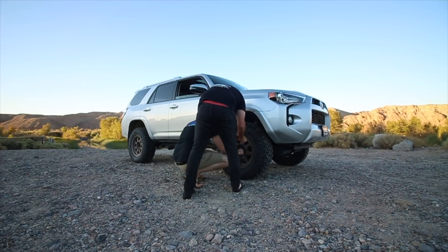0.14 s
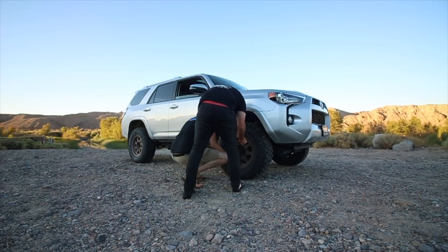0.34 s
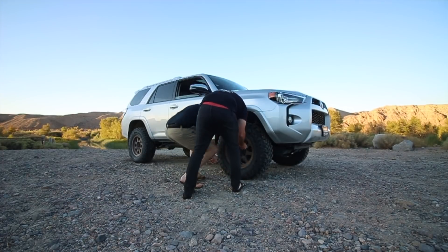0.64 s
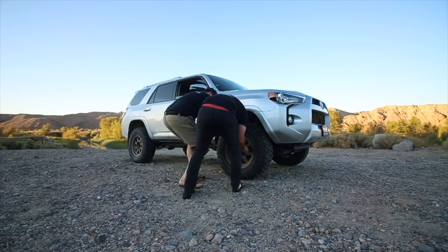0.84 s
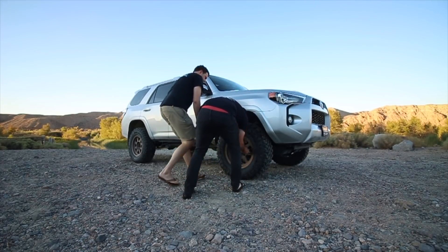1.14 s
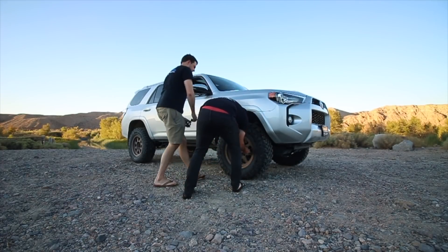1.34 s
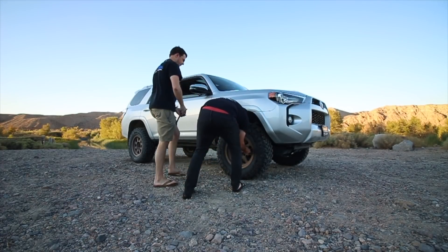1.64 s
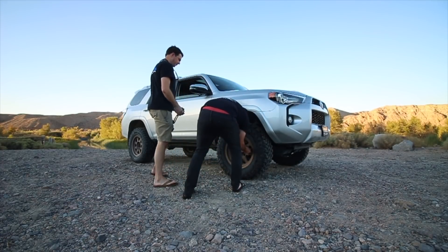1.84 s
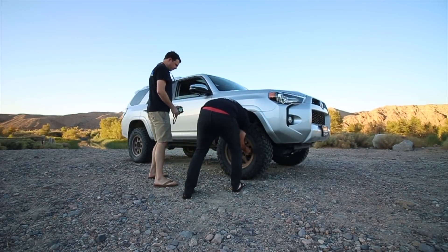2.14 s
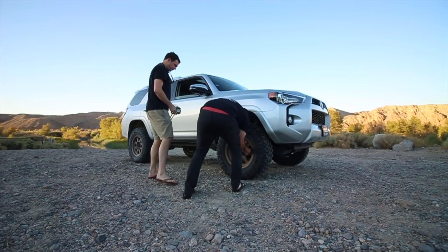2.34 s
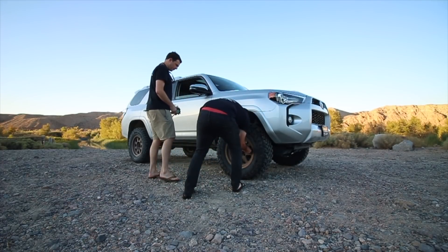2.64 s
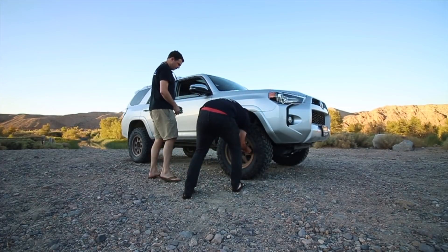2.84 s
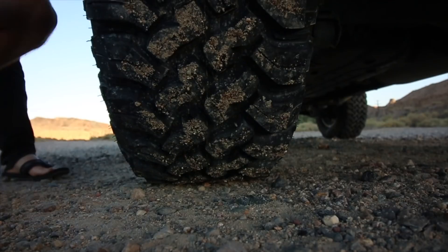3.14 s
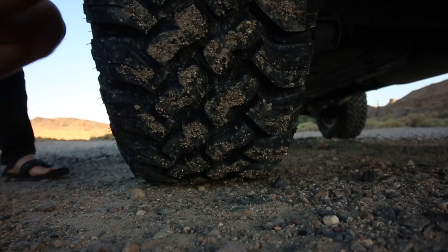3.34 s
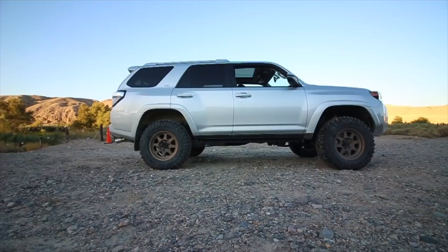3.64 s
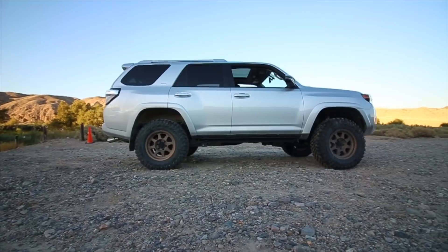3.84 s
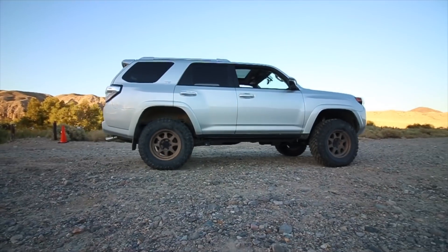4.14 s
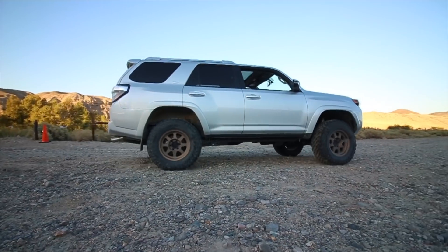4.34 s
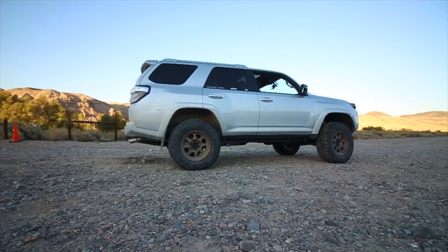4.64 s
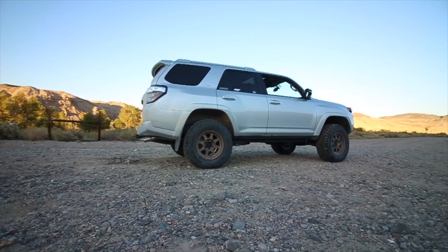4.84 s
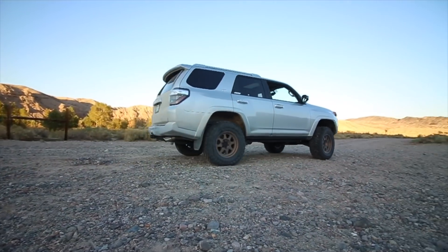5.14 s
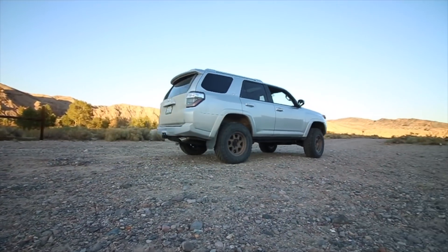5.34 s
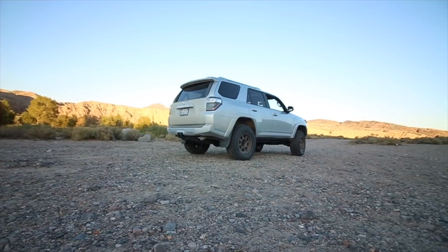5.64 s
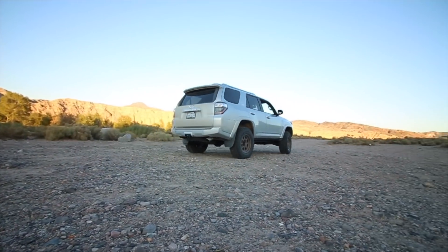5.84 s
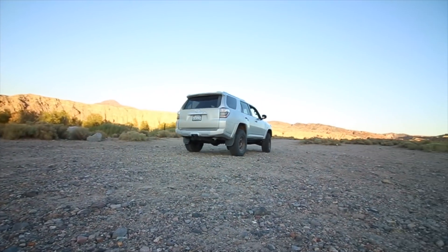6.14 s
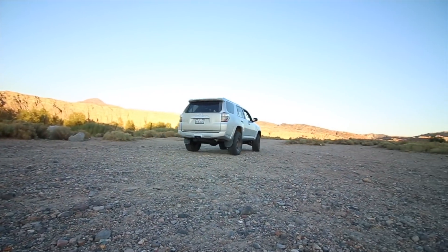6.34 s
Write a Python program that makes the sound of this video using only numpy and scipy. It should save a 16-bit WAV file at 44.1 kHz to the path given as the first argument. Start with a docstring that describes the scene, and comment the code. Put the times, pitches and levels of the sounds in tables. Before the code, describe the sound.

A tyre is let down outdoors: steady rushing air, a strong swell, a brighter hiss, then a fading pinch and descending chirps. Near-quiet with a faint finger scuff follows, then an abrupt second spurt that ends sharply. The scene cuts through a blink of silence to a heavy vehicle passing near the microphone, low rumble beneath gritty gravel crunch, pebble clicks and dull knocks, gradually moving off. Everything sits left, with barely audible noise on the right.

```python
"""Over faint outdoor noise a tyre valve cracks open and air hisses out: resonant turbulence plus a free jet. A
long release, pinched shut with a falling squeal, is followed by a shorter one that stops dead. In each, one
broad blast of noise thins into a bright jet. After a brief silence the scene changes: a vehicle rolls slowly
past and away over gravel: shaped noise and random impacts whose gain follows distance, with stones popping as
damped tones and noise bursts. All this is on the left channel; the right holds only a faint noise floor."""
import sys
import numpy as np
from scipy import signal
from scipy.fft import rfft, irfft, next_fast_len
from scipy.io import wavfile
from scipy.ndimage import map_coordinates

SR = 44100
rng = np.random.default_rng(int(sys.argv[2]) if len(sys.argv) > 2 else 0)


def waveform_to_disk(signal):
    """Save audio, clipped to [-1, 1], as 16-bit WAV at the path in sys.argv[1]."""
    frames = np.transpose(np.atleast_2d(signal))
    scaled = np.clip(frames, -1, 1) * 32767
    samples = np.round(scaled).astype(np.int16)
    wavfile.write(sys.argv[1], SR, samples)


N = 287002  # length in samples
# Source levels in dB are set before the common gain of 2 on the left channel.


def amp(db):
    """Logarithmic level: decibels to amplitude gain."""
    return 10 ** (np.asarray(db) / 20)


def unit(x):
    """Power normalisation: x at rms 1."""
    return x / np.sqrt(np.mean(x ** 2) + 1e-20)


def clock():
    """Uniform sampling: the time of every sample in seconds."""
    return np.arange(N) / SR


def since(start):
    """Elapsed time: seconds gone by after a moment, 0 before it."""
    return np.maximum(clock() - start, 0)


def gate(start, attack, end, release):
    """Linear envelope: 0 to 1 over the attack, held until the end, back to 0 over the release."""
    return np.clip(np.minimum((clock() - start) / attack, 1 - (clock() - end) / release), 0, 1)


def bump(at, width):
    """Gaussian envelope: a smooth swell of height 1, width being its standard deviation."""
    return np.exp(-.5 * ((clock() - at) / width) ** 2)


def wobble(rate):
    """Band-limited fluctuation: a smooth random curve with rate knots a second."""
    return map_coordinates(rng.standard_normal(int(N * rate / SR) + 4), [clock() * rate])


def filtered(x, response):
    """Linear filtering: the spectrum of x times a response of frequency."""
    m = next_fast_len(N + SR // 4)
    return irfft(rfft(x, m) * response(np.fft.rfftfreq(m, 1 / SR)), m)[..., :N]


def coloured(x, spectrum):
    """Spectral shaping: x through (Hz, dB) points on a log frequency axis, at rms 1."""
    f, db = np.transpose(spectrum)
    return unit(filtered(x, lambda hz: amp(np.interp(np.log(hz + 1), np.log(f + 1), db))))


def turbulence(modes):
    """Resonance: turbulent noise in steep-sided modes (Hz, width Hz, dB) that add in power, at rms 1."""
    def power(f):
        return sum(amp(db) ** 2 / (1 + ((f * f - centre * centre) / ((f + 1) * width)) ** 2) ** 2
                   for centre, width, db in modes)
    return unit(filtered(rng.standard_normal(N), lambda f: np.sqrt(power(f))))


def reflections(x, echo_db, spread, count):
    """Comb filtering: weak delayed copies off rim, bodywork and ground comb the sound finely."""
    response = np.zeros(int(spread * SR) + 2)
    response[0] = 1  # direct sound
    for place, size in rng.uniform(0, 1, (count, 2)):
        delay = int((.15 + .85 * place) * spread * SR)
        response[delay] += amp(echo_db) * (.5 + size)
    return signal.fftconvolve(x, response / np.linalg.norm(response))[:N]


def impacts(rate, spread_db):
    """Random point process: rate contacts a second, many small and a few large, at rms 1."""
    hit = rng.random(N) < rate / SR
    size = np.minimum(rng.exponential(size=N), np.pi)
    return unit(hit * rng.choice([-1, 1], N) * amp(spread_db * size))


def crack(t, hz, t60, octaves):
    """Damped noise: a burst centred on one pitch, falling 60 dB in t60 seconds, peak 1."""
    f = np.fft.rfftfreq(len(t), 1 / SR) + 1
    band = 1 / (1 + (np.log2(f / hz) / octaves) ** 2)
    burst = irfft(rfft(rng.standard_normal(len(t))) * band, len(t)) * amp(-60 * t / t60)
    return burst / np.abs(burst).max()


# Outdoor noise spectrum. Each row: frequency in Hz, relative level in dB.
OUTDOOR_SPECTRUM = [(30, -36), (46, -22), (62, -8), (85, -7.5), (118, 1), (230, -4.5), (480, -13.5),
                    (1000, -14), (1250, -18.5), (1600, -13.5), (2200, -21), (3050, -19.5), (3900, -31),
                    (7000, -35.5), (15700, -35.5)]


def outdoors(level_db=-57):
    """Ambient noise: a shaped random background whose level drifts gently."""
    return amp(level_db + 1.1 * wobble(5.97)) * coloured(rng.standard_normal(N), OUTDOOR_SPECTRUM)


def noise_floor(level_db=-71.0):
    """Stationary noise: a faint floor, stronger in the bass."""
    spectrum = [(30, 0), (300, -9.5), (2000, -13.5), (15000, -15.5)]
    return amp(level_db) * coloured(rng.standard_normal(N), spectrum)


# Broad humps of the free jet. Each row: centre in Hz, width in Hz, relative level in dB.
JET_HUMPS = [(4050, 2900, -1.5), (4720, 560, -5), (5800, 950, 0), (6930, 1240, -1), (8280, 2200, -2.5),
             (11250, 4800, -3.5), (13360, 4000, -2), (15500, 2000, -8.5)]
SIZZLE_HZ = 11200  # the top of the jet lies above this


def free_jet(sizzle_db):
    """Jet mixing noise: a broadband hiss with its top raised or lowered by sizzle_db."""
    hiss = turbulence(JET_HUMPS)
    top = filtered(hiss, lambda hz: 1 - 1 / (1 + (hz / SIZZLE_HZ) ** 12))
    return hiss + (amp(sizzle_db) - 1) * top


# Air resonances of a hard flow between stem, fingers and rim.
# Each row: centre in Hz, width in Hz, relative level in dB.
BLAST_MODES = [(456, 570, -20), (960, 500, -13.5), (1520, 1180, -6), (1840, 280, -4), (2142, 260, -1.5),
               (2680, 540, -2), (3100, 310, -3.5), (3660, 910, -8.5), (4410, 1540, -13), (6650, 8600, -19)]


def seal(at=0.1287, width_s=0.0031, ring_db=-27, hiss_db=-38, leak_s=0.0088, leak_db=-41):
    """Impulsive excitation: amid a brief leak, one sharp puff rings the stem's mouth."""
    mouth = turbulence([(3020, 700, 0.5), (2000, 2300, -14), (5940, 4800, -12)])
    puff = amp(ring_db) * mouth + amp(hiss_db) * turbulence(JET_HUMPS)
    leak = amp(leak_db) * turbulence(BLAST_MODES)
    return bump(at, width_s) * puff + bump(at, leak_s) * leak


AJAR_SIZZLE_DB = -2  # a valve only ajar dulls the top of the jet


def spurt(at=0.144, first_hz=3300, sink_octaves_per_s=21, knots_per_s=1500, band_db=-30.5, roar_db=-33.0,
          hiss_db=-41, attack_s=0.0034, length_s=0.063, release_s=0.017, fade_db_per_s=50,
          band_fade_db_per_s=290):
    """Gliding resonance: a fading blast with a band of turbulence that sinks as the gap widens."""
    t = since(at)
    phase = 2 * np.pi * np.cumsum(first_hz * 2 ** (-sink_octaves_per_s * t)) / SR
    # two random quadrature envelopes turn the gliding tone into a noise band
    band = unit(wobble(knots_per_s) * np.sin(phase) + wobble(knots_per_s) * np.cos(phase))
    edge = amp(band_db) * band + amp(hiss_db) * free_jet(AJAR_SIZZLE_DB)
    roar = amp(roar_db - fade_db_per_s * t) * turbulence(BLAST_MODES)
    return gate(at, attack_s, at + length_s, release_s) * (roar + amp(-band_fade_db_per_s * t) * edge)


# The valve is pushed wide. Each row: start in seconds, rise in seconds, length of the blast in seconds.
SURGES = [(0.97, 0.12, 0.26), (3.011, 0.012, 0.15)]
# The fingers shift and let a little more or less through.
# Each row: centre in seconds, Gaussian half length in seconds, change of roar in dB.
SLIPS = [(1.62, 0.039, 2), (1.772, 0.019, 3), (1.834, 0.036, -3.5), (1.943, 0.018, 3), (2.21, 0.025, 2.5),
         (3.474, 0.023, -1), (3.554, 0.037, 1.5)]
BLAST_DB, BLAST_FALL_S = 11.5, 0.11  # the roar swells, then collapses
JET_LEAD_S, JET_RISE_S, JET_HOLD_S, JET_FALL_S = 0.018, 0.045, 0.18, 0.11  # lead: before the blast ends
JET_HISS_DB, JET_ROAR_DB = 7.5, 3  # what the bright jet adds to hiss and roar
SLIP_HISS_SHARE = 0.59  # slips change the hiss less than the roar


def pressing():
    """Flow modulation: roar and hiss changes in dB as blasts give way to jets and fingers slip."""
    blast = sum(gate(s, rise, s + length, BLAST_FALL_S) for s, rise, length in SURGES)
    jet = sum(gate(s + length - JET_LEAD_S, JET_RISE_S, s + length + JET_HOLD_S, JET_FALL_S)
              for s, _, length in SURGES)
    slip_db = sum(db * bump(s, width) for s, width, db in SLIPS)
    roar_db = np.maximum(BLAST_DB * blast, JET_ROAR_DB * jet) + slip_db
    return roar_db, JET_HISS_DB * jet + SLIP_HISS_SHARE * slip_db


# The valve is held open. Each row: start in seconds, end in seconds, time spent pinching before the end
# in seconds, shutting in seconds, base roar level in dB, base jet hiss level in dB.
RELEASES = [(0.117, 2.286, 0.43, 0.054, -40, -42.5), (3.021, 3.689, 0, 0.0036, -40, -42)]
# Air resonances between stem, fingers and rim with the valve ajar, then open.
# Each row: centre in Hz, width in Hz, relative level in dB.
AJAR_MODES = [(560, 900, -10.5), (854, 49, -0.5), (1160, 390, -5.5), (1645, 490, 1), (1960, 340, -0.5),
              (2610, 460, -4), (3160, 820, 0.5), (3990, 130, -23)]
OPEN_MODES = [(480, 660, -9.5), (866, 150, -11), (1330, 1000, -6), (1900, 630, -2), (2160, 160, -1.5),
              (2656, 310, 1.5), (3104, 580, 1)]
OPENING_S = 0.0028
PINCH_ROAR_DB_PER_S, PINCH_HISS_DB_PER_S = 44.5, 37.5  # the flow dies as the gap narrows
PINCH_SIZZLE_DB_PER_S = 8  # while the top of the jet brightens against the rest
REGRIP_AT_S, REGRIP_S = 0.97, 0.32  # the fingers shift and the valve goes from ajar to open
AJAR_SAG_DB_PER_S, AJAR_HISS_DB = 3, 0.4  # while ajar the roar sags; the hiss is slightly raised


def valve(blast_from_db=-34, blast_range_db=2.0, ajar_db=-1.6, churn_db=1.3, flutter_db=0.46):
    """Flow noise: a bright jet, and a roar whose resonances follow the grip and the strength of the flow."""
    air = np.zeros(N)
    opened = np.clip(.5 + (clock() - REGRIP_AT_S) / REGRIP_S, 0, 1)
    ajar = 1 - opened
    more_roar, more_hiss = pressing()
    more_roar = more_roar + ajar * (ajar_db + AJAR_SAG_DB_PER_S * (REGRIP_AT_S - clock()))
    more_hiss = more_hiss + ajar * AJAR_HISS_DB
    for start, end, pinch, shutting, roar_db, hiss_db in RELEASES:
        pinched = np.minimum(since(end - pinch), pinch + shutting)
        roar = roar_db + more_roar - PINCH_ROAR_DB_PER_S * pinched
        hiss = hiss_db + more_hiss - PINCH_HISS_DB_PER_S * pinched
        # a hard flow roars more broadly; square roots keep the power of each crossfade
        blast = .5 + .5 * np.tanh((roar - blast_from_db) / (2 * blast_range_db))
        steady = np.sqrt(ajar) * turbulence(AJAR_MODES) + np.sqrt(opened) * turbulence(OPEN_MODES)
        churning = turbulence(BLAST_MODES) * amp(churn_db * wobble(250))
        mouth = np.sqrt(1 - blast) * steady + np.sqrt(blast) * churning
        jet = free_jet(ajar * AJAR_SIZZLE_DB + PINCH_SIZZLE_DB_PER_S * pinched)
        flow = amp(roar) * mouth + amp(hiss) * jet
        air += gate(start, OPENING_S, end, shutting) * flow * amp(flutter_db * wobble(29.88))
    return air


# Chirps of the closing gap. Each row: start in seconds, length in seconds, first pitch in Hz, settling pitch
# in Hz, glide time constant in seconds, starting fundamental rms level in dB, starting octave rms level in dB.
CHIRPS = [(2.143, 0.042, 2060, 1584, 0.0116, -44, -55), (2.195, 0.038, 1560, 960, 0.035, -60, -51)]


def squeal(jitter=0.0061, third_db=-66, attack_s=0.0049, release_s=0.012, fade_db_per_s=150):
    """Harmonic whistle: the last narrow gap chirps twice, each sliding down in pitch as it fades."""
    out = np.zeros(N)
    for start, length, first_hz, settling_hz, glide, first_db, octave_db in CHIRPS:
        t = since(start)
        hz = settling_hz + (first_hz - settling_hz) * np.exp(-t / glide)
        phase = 2 * np.pi * np.cumsum(hz * (1 + jitter * wobble(400))) / SR
        levels = (first_db, octave_db, third_db)
        tone = np.sqrt(2) * sum(amp(db) * np.sin(k * phase) for k, db in enumerate(levels, 1))
        out += gate(start, attack_s, start + length, release_s) * amp(-fade_db_per_s * t) * tone
    return out


def scuff(at=2.597, length=0.022, level_db=-62):
    """Friction noise: a faint scrape of fingers on the stem between the releases."""
    return amp(level_db) * bump(at, length) * turbulence([(1650, 500, -2), (3200, 2000, -9), (11000, 7000, -19)])


def nearness(at, distance, speed_m_per_s=3.3):
    """Inverse distance law: gain of a passing source, 1 at its closest moment."""
    return distance / np.hypot(distance, speed_m_per_s * (clock() - at))


def pebbles(count, hz, spread_db, cycles):
    """Damped oscillation: small stones shift at random moments, each ringing at its own pitch, at rms 1."""
    place, size = rng.random(count), np.minimum(rng.exponential(size=count), np.pi)
    pitch = np.clip(hz * 2 ** rng.standard_normal((count, 1)), 300, 3400)
    t = np.arange(SR // 20) / SR
    ringing = np.sin(2 * np.pi * pitch * t) * amp(-60 * t * pitch / cycles)
    grains = amp(spread_db * size)[:, None] * ringing * np.sqrt(hz / pitch)
    where = (place * N).astype(int)[:, None] + np.arange(len(t))
    return unit(np.bincount(where.ravel(), grains.ravel(), N)[:N])


# Spectrum of fine grit. Each row: frequency in Hz, relative level in dB.
GRIT_SPECTRUM = [(2350, -19), (4000, -0.5), (6290, -5.5), (9380, -10), (13100, -10.5), (15700, -13)]


def ticks(rate, spread_db, t60):
    """Random damped bursts: chips of stone flicked about, each tiny and bright, at rms 1."""
    dying = amp(-60 * (np.arange(SR // 20) / SR) / t60)
    envelope = signal.fftconvolve(impacts(rate, spread_db), dying)[:N]
    return coloured(envelope * rng.standard_normal(N), GRIT_SPECTRUM)


# Spectra of engine and tyre rumble, then of stones crunching.
# Each row: frequency in Hz, relative level in dB.
RUMBLE_SPECTRUM = [(25, -34), (46, -32), (64, -3.5), (78, -7), (98, 3), (180, 1), (300, 2.5), (370, 0.5),
                   (450, -5.5), (530, -2.5), (680, -3.5), (950, -32), (1600, -80)]
CRUNCH_SPECTRUM = [(200, -13), (380, -5.5), (460, -9), (650, -6.5), (900, -7), (1250, -11.5), (1900, -13),
                   (2350, -15), (2700, -13.5), (3200, -17), (3700, -25.5), (6000, -45), (12000, -80)]
NEAREST_AT_S, DISTANCE_M = 4.99, 3.45  # closest pass of the tread
EXHAUST_LAG_S, EXHAUST_DISTANCE_M = 0.36, 3.36  # the rumble peaks once the tail has gone by
SHADOW_DB_PER_S = 0.7  # the finest grit steadily weakens through the pass


def rolling(rumble_db=-46.0, crunch_db=-51.5, pebble_db=-56.0, grit_db=-68.5, tick_db=-79):
    """Rolling contact noise: engine and tyre rumble and grinding stones, all fading with distance."""
    bite = wobble(22)  # tread blocks catch the gravel in clumps
    rumble = coloured(rng.standard_normal(N) + .5 * impacts(300, spread_db=0), RUMBLE_SPECTRUM)
    low = amp(rumble_db + 0.37 * wobble(8.8)) * rumble
    crunch = coloured(rng.standard_normal(N) + 0.7 * impacts(700, spread_db=5.0), CRUNCH_SPECTRUM)
    stones = amp(crunch_db + 1.23 * bite) * crunch
    loose = amp(pebble_db) * pebbles(count=1000, hz=1206, spread_db=4.5, cycles=14)
    grit = coloured(rng.standard_normal(N) + 0.48 * impacts(400, spread_db=6.5), GRIT_SPECTRUM)
    sand = amp(grit_db + 1.5 * bite) * grit
    chips = amp(tick_db) * ticks(rate=20, spread_db=1, t60=0.025)
    fine = amp(-SHADOW_DB_PER_S * (clock() - NEAREST_AT_S)) * (sand + chips)
    exhaust_gain = nearness(NEAREST_AT_S + EXHAUST_LAG_S, EXHAUST_DISTANCE_M)
    return exhaust_gain * low + nearness(NEAREST_AT_S, DISTANCE_M) * (stones + loose + fine)


# Pebbles clicking together.
# Each row: start in seconds, peak level in dB before the common level_db trim, pitch in Hz.
CLICKS = [(3.8305, -43.5, 4630), (4.6558, -50, 3930), (4.8259, -43, 8540), (4.8574, -49, 11200),
          (4.9364, -43, 3800), (4.9464, -49, 4480), (5.0674, -49, 3950), (5.1173, -46, 4430),
          (5.9564, -43.5, 3810), (6.1634, -52, 3700), (6.2188, -54, 4070)]


def clicks(level_db=-3, t60=0.023, octaves=0.8):
    """Hard impact: stone on stone gives a short bright crack around each pebble's own pitch."""
    out, t = np.zeros(N + SR), np.arange(SR // 20 * 2) / SR
    for s, db, hz in CLICKS:
        out[round(s * SR):][:len(t)] += amp(db + level_db) * crack(t, hz, t60, octaves)
    return out[:N]


# Stones squeezed out from under the tread. Each row: start in seconds, knock peak in dB, pitch in Hz,
# crunch and tyre thump in dB against the knock, before the common crunch_db and thump_db trims.
POPS = [(4.113, -37, 715, -20, -15), (4.134, -36.5, 656, -19, -11), (4.14, -34.5, 807, -23, -19),
        (4.38, -37.5, 929, -18, -13), (4.636, -38.5, 880, -20, -8), (4.668, -35.5, 635, -18, -18),
        (4.723, -37.5, 611, -11, -15), (4.853, -35, 623, -19, -8), (4.888, -35, 645, -19, -11),
        (4.909, -34.5, 537, -25, -9), (4.935, -38, 570, -15, -2), (5.372, -37.5, 635, -21, -3.5),
        (5.607, -38, 580, -20, 0), (5.705, -38.5, 547, -9, -20), (6.178, -35, 630, -16.5, -18),
        (6.281, -40, 549, -12, -16)]


def pops(level_db=0, cycles=16, crunch_db=8, crunch_hz=1700, crunch_t60=0.047,
         thump_db=5, thump_hz=315, thump_t60=0.044):
    """Damped impact: each stone knocks dully in the rubber, thumps the tyre and crunches on its neighbours."""
    out, t = np.zeros(N + SR), np.arange(SR // 20 * 2) / SR
    thump = np.sin(2 * np.pi * thump_hz * t) * amp(thump_db - 60 * t / thump_t60)
    for s, db, hz, bright_db, low_db in POPS:
        tone = np.sin(2 * np.pi * hz * t) + amp(-9.5) * np.sin(2 * np.pi * 1.57 * hz * t)
        knock = tone * amp(-60 * t * hz / cycles) * (1 - np.exp(-t / 0.00031))  # soft onset
        crunch = amp(bright_db + crunch_db) * crack(t, crunch_hz, crunch_t60, octaves=0.45)
        pop = knock / np.abs(knock).max() + crunch + amp(low_db) * thump
        out[round(s * SR):][:len(t)] += amp(db + level_db) * pop
    return out[:N]


# The silent break where the scene changes, one row: from in seconds, to in seconds.
SILENCE = (3.702, 3.722)


def scene():
    """Superposition: the valve in quiet open air, then the drive; the right has only a noise floor."""
    air = seal() + spurt() + valve() + scuff()
    deflating = reflections(air, echo_db=-26.0, spread=.02, count=12) + squeal() + outdoors()
    driving = rolling() + clicks() + pops()
    before, after = clock() < SILENCE[0], clock() > SILENCE[1]
    left = 2 * (deflating * before + driving * after)
    return np.array([left, noise_floor() * (before | after)])


def record(dry, low_cut_hz=42, top_hz=15850):
    """Band limiting: the microphone drops the deepest bass, and a steep edge removes the extreme treble."""
    thinned = signal.sosfilt(signal.butter(3, low_cut_hz, "highpass", fs=SR, output="sos"), dry)
    return filtered(thinned, lambda hz: np.clip((top_hz - hz) / 100 + .5, 0, 1))


dry = scene()
out = record(dry)
waveform_to_disk(out)
```